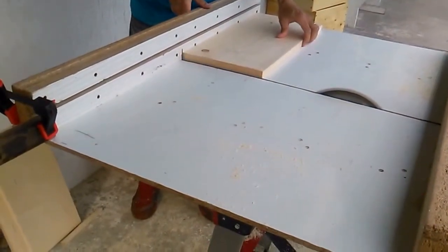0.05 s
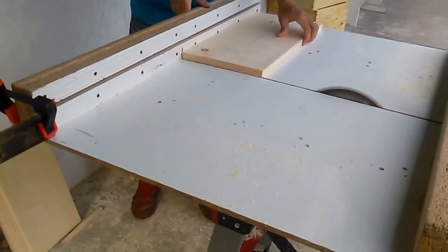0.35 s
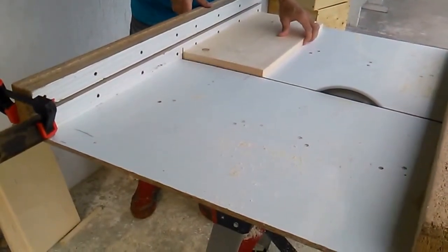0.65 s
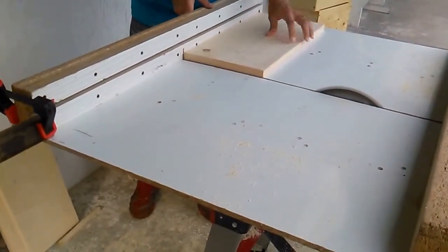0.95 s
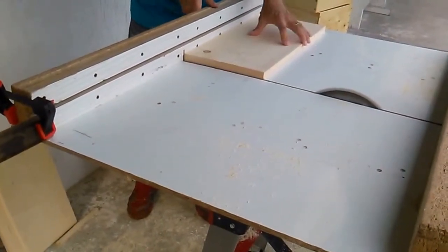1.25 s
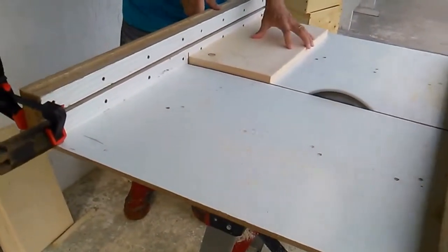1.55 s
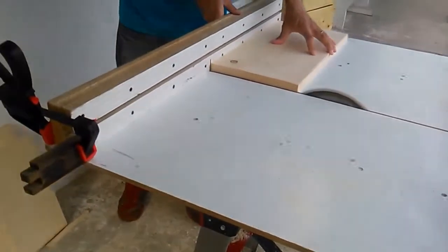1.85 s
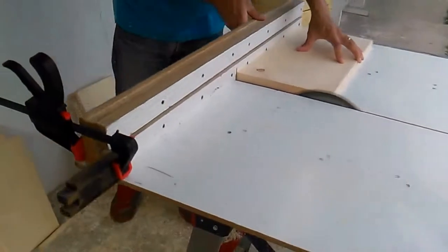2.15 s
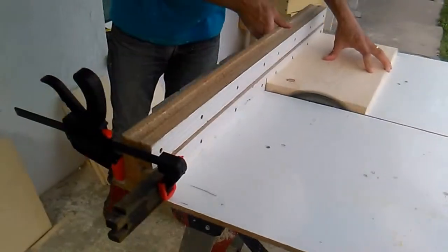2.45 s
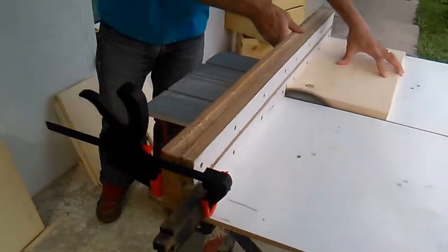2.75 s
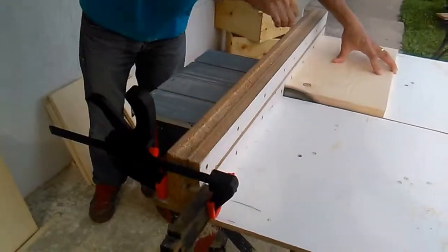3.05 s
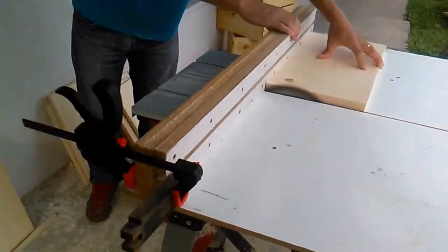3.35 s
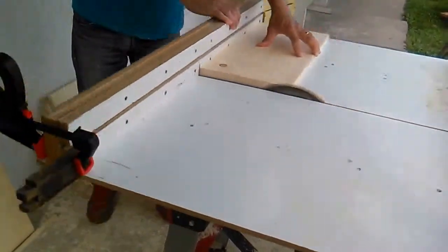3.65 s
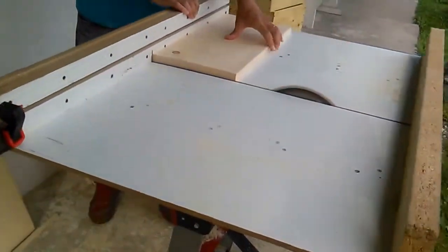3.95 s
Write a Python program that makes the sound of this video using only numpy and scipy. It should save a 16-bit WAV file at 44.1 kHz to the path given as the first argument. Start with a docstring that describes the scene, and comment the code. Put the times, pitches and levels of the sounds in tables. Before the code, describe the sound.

In a slightly echoing workshop, a table saw whines and whistles, then bites into a board. The blade slows as it screams and tears through the wood, and picks up some speed as the cut eases.

```python
"""A table saw whines in a workshop, and after two seconds a board is pushed into its blade.
The teeth strike the wood in a periodic train of blows that rings the steel plate, tears fibres and sprays
dust. Load slows the shaft, so the tones locked to it sag in pitch, then partly recover as the feed eases.
Behind the cut lie the whine of motor, gears and passing teeth, rushing air and the hum of the table.
An automatic gain control holds the loudness, so the free-running whine ducks under the cut."""
import sys
import numpy as np
from scipy import signal
from scipy.fft import rfft, irfft
from scipy.io import wavfile
from scipy.ndimage import uniform_filter1d, map_coordinates

SR = 44100
rng = np.random.default_rng(int(sys.argv[2]) if len(sys.argv) > 2 else 0)


def persist_wave(psi):
    """Save psi, clipped to +-1, as 16-bit WAV."""
    counts = np.round(np.clip(psi, -1, 1) * 32767).astype(np.int16)
    wavfile.write(sys.argv[1], SR, np.atleast_2d(counts).T)


N = 176400
T = np.arange(N) / SR
TEETH, IDLE_TURNS_PER_S = 60, 96.75

# Rotation of the blade. Each row: time in seconds, turns per second.
BLADE_SPEED = [(0, 96.63), (1.2, 96.77), (2.04, 96.8), (2.1, 95.4), (2.2, 92.2), (2.3, 89.65), (2.45, 86.2),
               (2.6, 83.3), (2.7, 81.6), (2.78, 81.1), (3, 83.1), (3.25, 85.25), (3.35, 86), (3.5, 86.25),
               (3.75, 87.1), (3.87, 87.7), (4, 89.5)]

# Spectra of the noises. Each row: frequency in Hz, relative spectral density in dB.
PLATE_SPECTRUM = [(2500, -37.5), (4000, -11.5), (5000, -3.5), (5700, -4), (6200, 1), (7100, 0), (7600, -7),
                  (8200, -8.5), (9500, -22.5), (12000, -32), (15500, -31)]
WOOD_SPECTRUM = [(50, -24), (130, -14), (250, -9), (450, -8), (620, -6.5), (1000, -2), (1800, 3),
                 (3200, 2.5), (4500, -12), (8000, -9), (15500, -24)]
DUST_SPECTRUM = [(4000, -21), (8300, 7), (10000, -10), (13000, -9), (15500, -8.5)]
SCRAPE_SPECTRUM = [(100, -39), (260, -7.5), (530, -2), (900, -29), (2600, -7), (3150, 8.5), (5000, -40)]
AIR_SPECTRUM = [(30, -24), (60, -31), (130, -26.5), (250, -14.5), (600, -16.5), (1100, -9.5), (2000, -7.5),
                (2950, -7.5), (3300, -0.5), (3600, -1), (3950, 1), (4550, -2.5), (5300, -1), (6600, 1.5),
                (7250, -1.5), (7800, -8), (10000, -21), (15500, -22)]
TICK_SPECTRUM = [(5000, -22), (9000, 2), (12000, 5), (15500, -11)]

# Envelopes of the sources. Each row: time in seconds, level in dB.
BITE_LEVEL = [(1.97, -45), (2.03, -24), (2.09, -7.5), (2.3, -6.5), (2.62, -2.5), (2.85, -3), (3.11, -9.5),
              (3.3, -8.5), (3.42, -1), (3.64, -7), (3.72, -16), (3.79, -11), (3.86, -18.5), (4, -25)]
TEAR_LEVEL = [(2.0, -36), (2.12, -19.5), (2.3, -16.5), (2.62, -11.5), (2.85, -14), (3.13, -12),
              (3.25, -13.5), (3.33, -12), (3.43, -10), (3.52, -10), (3.64, -15.5), (3.72, -16.5),
              (3.86, -20.5), (4, -27)]
DUST_LEVEL = [(1.98, -42), (2.08, -14.5), (2.3, -12), (2.55, -14.5), (2.68, -11), (2.85, -28), (3.5, -23),
              (4, -52)]
THUMP_LEVEL = [(2.1, -56.5), (2.35, -41), (2.56, -32), (2.7, -49), (2.84, -35.5), (3, -30), (3.25, -43),
               (3.5, -29.5), (3.75, -46), (4, -51.5)]
TOOTH_TONE_LEVEL = [(1.95, -43), (2.05, -17), (2.23, -17.5), (2.36, -21), (2.47, -13), (2.56, -19),
                    (2.79, -25), (2.99, -14), (3.1, -17), (3.25, -9), (3.43, -17), (3.52, -15), (3.78, -28),
                    (3.84, -14.5), (3.88, -18), (3.94, -40)]
SCREAM_LEVEL = [(1.95, -55), (2.04, -32), (2.18, -24), (2.42, -28), (2.55, -26), (2.72, -22), (2.86, -31),
                (3, -55)]
SCRAPE_LEVEL = [(3.62, -50), (3.72, -36), (3.8, -20), (3.88, -23), (4, -25)]
WHINE_LEVEL = [(0, 1.5), (1.3, 0), (2.03, 1), (2.2, -8)]
RECOVERY_LEVEL = [(2.9, -54), (3.15, -28), (3.35, -26), (3.6, -42), (3.8, -32), (4, -38)]
HUM_LEVEL = [(1.22, -57), (1.33, -45.5), (2, -48), (2.7, -52), (3.4, -45.5), (4, -46)]

# Strongest modes of the steel plate. Each row: frequency in Hz, relative level in dB.
PLATE_MODES = [(5798, -15), (6120, -14), (6255, -13), (6395, -9), (6515, -13.5), (6800, -9.5), (6980, -16),
               (7070, -12)]
# Housing resonances, driven by the cut and by air. Each row: frequency in Hz, width in Hz, gain in dB.
HOUSING_CUT_MODES = [(400, 31, 4.5), (507, 45, 4.5), (764, 72, 4), (877, 58, 8.5)]
HOUSING_AIR_MODES = [(403, 24, 1), (758, 33, 4), (879, 28, 8.5)]
# Partials of the tooth tone and the scream. Each row: multiple of the tooth rate, relative level in dB.
TOOTH_PARTIALS = [(1, 2), (2, -30), (3, -20)]
SCREAM_PARTIALS = [(1.5, 3.5), (2, 0), (2.5, -3), (3, -3)]
# Break-up of the tooth tone, deepest in a hard bite. Each row: time in seconds, depth in dB.
SPUTTER_DEPTH = [(2.05, 4), (2.15, 6), (2.8, 5), (2.95, 2), (3.28, 2), (3.45, 6), (3.84, 2.5)]
# Harmonics of the thumping board. Each row: multiple of the blade speed, relative level in dB.
THUMP_HARMONICS = [(2, -1.5), (3, -3.5), (6, -7.5), (7, -10)]
# Squeals in the kerf. Each row: start in seconds, length in seconds, pitch in Hz, level in dB,
# phase jitter in cycles.
SQUEALS = [(2.005, .11, 5790, -12.5, 0.24), (2.68, 0.16, 2476, -18, 0.1), (3.06, .06, 4320, -13.5, 0.12),
           (3.463, .2, 4620, -16, .2), (3.62, .07, 6390, -10, .08)]
# Snapping of splinters. Each row: time in seconds, mean snaps per second.
SPLINTER_RATE = [(2, 0), (2.1, 25), (3.43, 8), (3.48, 110), (3.62, 90), (3.68, 5)]
# Whine of motor, gears and passing teeth. Each row: frequency at idle speed in Hz, relative level in dB.
WHINE_PARTIALS = [(3916, -31.5), (4206, -35.5), (4400, -30), (4787, -39.5), (4980, -31.5), (5809, -28.5),
                  (5949, -33)]
# Whistles of the free saw. Each row: frequency at idle speed in Hz, list of (time in seconds, level in dB).
IDLE_WHISTLES = [(5271, [(0, -28.5), (1.05, -20), (1.45, -23.5), (2.06, -23), (2.2, -48)]),
                 (5368, [(0, -22.5), (1.05, -25), (1.55, -35), (2.0, -27), (2.15, -55)]),
                 (5658, [(0.4, -24), (0.9, -30), (1.45, -21), (1.8, -26), (2.05, -28), (2.15, -55)]),
                 (11170, [(0, -39), (0.35, -49), (0.65, -45), (1.15, -55), (1.75, -40), (2.02, -40),
                 (2.2, -56)])]


def cutting(turns):
    """Impact excitation: one train of blows drives plate, wood and dust; the first two reverberate."""
    blows = tooth_blows(turns)
    return workshop(steel_plate(blows, turns) + tearing_wood(blows, turns)) + sawdust(blows)


def tooth_blows(turns):
    """Periodic forcing: each tooth strikes a decaying blow of random strength."""
    passes = turns * TEETH
    blow = passes.astype(int)
    strength = undb(rng.standard_normal(blow[-1] + 1)[blow])
    decay = np.exp(-(passes % 1) / 0.51)
    wobble = 1 + 0.073 * np.cos(4 * np.pi * turns)  # the blade wobbles against the kerf twice a turn
    return strength * decay * wobble


def steel_plate(blows, turns, width_hz=50, swell_db=3.5):
    """Modal resonance: narrow modes ring over a broad rasp, swelling and fading as wood grips the steel."""
    rasp = undb(-1.5) * colour(blows * turning_noise(turns, repeat=0.42), PLATE_SPECTRUM)
    drive = blows * rng.standard_normal(N)
    modes = 0
    for hz, db in PLATE_MODES:
        ring = signal.lfilter(*signal.iirpeak(hz, hz / width_hz, fs=SR), drive)
        swell = undb(swell_db * np.clip(waver(7), -2, 1))
        modes += undb(db) * unit(ring * swell)
    return undb(curve(BITE_LEVEL) + 1.4 * waver(16)) * (rasp + modes)


def tearing_wood(blows, turns):
    """Fracture noise: fibres tear at each blow and excite the hollow resonances of the housing."""
    tearing = colour(blows * turning_noise(turns, repeat=0.29), WOOD_SPECTRUM, HOUSING_CUT_MODES)
    return undb(curve(TEAR_LEVEL) + 0.44 * waver(24.26)) * tearing


def sawdust(blows):
    """Modulated noise: the spray of dust hisses in pulses at the tooth rate."""
    hiss = colour(blows * rng.standard_normal(N), DUST_SPECTRUM)
    return undb(curve(DUST_LEVEL) + 0.99 * waver(250)) * hiss


def tooth_tone(turns):
    """Harmonics of the tooth-passing frequency glide with the speed and sputter in a hard bite."""
    partials = 0
    for order, db in TOOTH_PARTIALS:
        flicker_db = 2 * waver(60) if order > 1 else 0
        partials += undb(db + flicker_db) * tone(TEETH * turns + 0.035 * waver(500), order)
    sputter = undb(curve(SPUTTER_DEPTH) * np.minimum(waver(110), 1))
    return undb(curve(TOOTH_TONE_LEVEL)) * sputter * partials


def scream(turns, jitter_cycles=0.38):
    """Phase modulation broadens whole and half multiples of the tooth rate: the first bite screams."""
    partials = sum(undb(db + 1.7 * waver(50.2)) * tone(order * TEETH * turns + jitter_cycles * waver(500))
                   for order, db in SCREAM_PARTIALS)
    return undb(curve(SCREAM_LEVEL)) * partials


def squeals(fall_per_s=0.037):
    """Friction: the side of the blade rubs the kerf in brief, rough, slightly falling tones."""
    out = 0
    for start, length, hz, db, jitter in SQUEALS:
        progress = np.clip((T - start) / length, 0, 1)
        swell = np.sqrt(np.maximum(np.sin(np.pi * progress), 0))
        pitch = hz * (1 - fall_per_s * (T - start - length / 2))
        out += undb(db + waver(60)) * swell * tone(np.cumsum(pitch) / SR + jitter * waver(200))
    return out


def splinters():
    """Brittle fracture: splinters snap off at random, louder as the teeth bite harder."""
    return undb(curve(BITE_LEVEL) - 2.5) * clicks(curve(SPLINTER_RATE), DUST_SPECTRUM)


def exit_scrape():
    """Sliding friction: the cut faces scrape along the back of the blade as the bite ends."""
    return undb(curve(SCRAPE_LEVEL) + waver(35)) * colour(rng.standard_normal(N), SCRAPE_SPECTRUM)


def board_thump(turns):
    """Forced vibration: the board thumps at harmonics of the rotation rate."""
    harmonics = sum(undb(db + 0.5 * waver(10)) * tone(turns + 0.034 * waver(22.06), order)
                    for order, db in THUMP_HARMONICS)
    return undb(curve(THUMP_LEVEL)) * harmonics


def saw_whine(turns):
    """Tones of motor, gears and passing teeth keep a fixed ratio to the shaft speed and fade under load."""
    idle_time = turns / IDLE_TURNS_PER_S
    partials = sum(undb(db + waver(9.7)) * tone(hz * idle_time + 0.035 * waver(30.5))
                   for hz, db in WHINE_PARTIALS)
    return undb(curve(WHINE_LEVEL)) * partials


def whistles(turns):
    """Shaft-locked tones swell and fade at idle; a thin motor whistle joins as the speed recovers."""
    idle_time = turns / IDLE_TURNS_PER_S
    idle = sum(undb(curve(level) + 0.8 * waver(10.4)) * tone(hz * idle_time + 0.017 * waver(22.7))
               for hz, level in IDLE_WHISTLES)
    recovery = undb(curve(RECOVERY_LEVEL) + 2 * waver(30.3)) * tone(116.2 * turns + 0.12 * waver(80))
    return idle + recovery


def rushing_air(turns):
    """Flow noise: air rushes round the blade and is filtered by the resonances of the housing."""
    return undb(-14) * colour(turning_noise(turns, repeat=0.23), AIR_SPECTRUM, HOUSING_AIR_MODES)


def table_hum(turns):
    """Forced vibration: the table hums at the rotation rate and its third harmonic."""
    fundamental = undb(curve(HUM_LEVEL) + 1.8 * waver(12)) * tone(turns + 0.025 * waver(25))
    third = undb(-48 + 2 * waver(7.3)) * tone(turns + 0.0092 * waver(33.1), order=3)
    return fundamental + third


def ticking():
    """Shot noise: a fine, bright ticking goes on throughout."""
    return undb(-22.5) * clicks(per_s=110, spectrum=TICK_SPECTRUM)


def workshop(x, t60_s=0.54, wet_db=-6):
    """Reverberation: reflections from the walls add a diffuse, exponentially decaying tail."""
    t = T[:SR // 2]
    tail = rng.standard_normal(len(t)) * undb(-60 * t / t60_s) * (t > .004)
    wet = signal.fftconvolve(x, tail / np.linalg.norm(tail))[:N]
    return (x + undb(wet_db) * wet) / np.hypot(1, undb(wet_db))


def clicks(per_s, spectrum, decay_s=0.0004):
    """A Poisson process: short noise bursts of uneven size fall at random moments."""
    hits = (rng.random(N) < per_s / SR) * undb(3.3 * np.clip(rng.standard_normal(N), -2, 1))
    bursts = signal.lfilter([1], [1, -np.exp(-1 / (decay_s * SR))], hits)
    return bursts * colour(rng.standard_normal(N), spectrum)


def turning_noise(turns, repeat, points_per_turn=512):
    """Comb filtering: a share of the noise comes back on every turn of the blade."""
    fresh = rng.standard_normal((int(turns[-1]) + 2, points_per_turn))
    recurring = signal.lfilter([1], [1, -repeat], fresh, axis=0)
    return unit(map_coordinates(recurring.ravel(), [turns * points_per_turn], order=3))


def colour(x, spectrum, modes=()):
    """Linear filtering by a broad spectrum and second-order resonances; rms 1."""
    f = np.arange(N // 2 + 1) * SR / N + 1e-3
    hz, db = np.array(spectrum).T
    gain = undb(np.interp(np.log(f), np.log(hz), db))
    for centre, width, lift_db in modes:
        detuning = (f * f - centre ** 2) / (f * width)
        gain = gain * (1 + (undb(lift_db) - 1) / (1 + 1j * detuning))
    return unit(irfft(rfft(x) * gain, N))


def tone(cycles, order=1):
    """A sinusoid of rms 1 with a random starting phase."""
    return np.sqrt(2) * np.sin(2 * np.pi * (order * cycles + rng.random()))


def waver(per_s):
    """Random steps smoothed into a slow fluctuation of rms 1."""
    hold = int(SR / per_s)
    steps = np.repeat(rng.standard_normal(N // hold + 1), hold)
    return unit(uniform_filter1d(uniform_filter1d(steps, hold), hold)[:N])


def curve(rows):
    """Linear interpolation through (seconds, value) rows."""
    return np.interp(T, *np.array(rows).T)


def unit(x):
    """Normalisation to rms 1."""
    return x / np.sqrt(np.mean(x ** 2))


def undb(db):
    """Decibels to amplitude ratio."""
    return 10 ** (np.asarray(db) / 20)


def scene():
    """Superposition: the cut and the running saw share one shaft; both channels are alike."""
    turns = np.cumsum(curve(BLADE_SPEED)) / SR
    blade = cutting(turns) + tooth_tone(turns) + scream(turns) + squeals()
    board = splinters() + exit_scrape() + board_thump(turns)
    running = saw_whine(turns) + whistles(turns) + rushing_air(turns) + table_hum(turns) + ticking()
    return np.tile(blade + board + running, (2, 1))


def record(dry, threshold_db=-13.5, window_s=0.019, makeup_db=1, ceiling=0.66):
    """Compression: gain control holds the level, peaks are rounded, and deep bass and top are cut."""
    rms = np.sqrt(uniform_filter1d(dry[0] ** 2, int(window_s * SR)) + 1e-12)
    held = dry * np.minimum(1, undb(threshold_db) / rms) * undb(makeup_db)
    rounded = held / (1 + (held / ceiling) ** 6) ** (1 / 6)
    thinned = signal.sosfilt(signal.butter(2, 36, "high", fs=SR, output="sos"), rounded)
    return signal.sosfilt(signal.ellip(12, .1, 80, 15700, fs=SR, output="sos"), thinned)


dry = scene()
out = record(dry)
persist_wave(out)
```